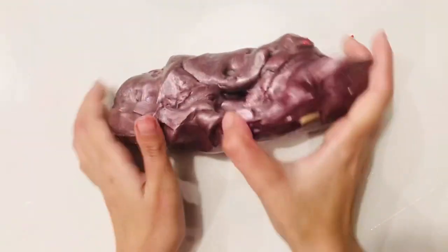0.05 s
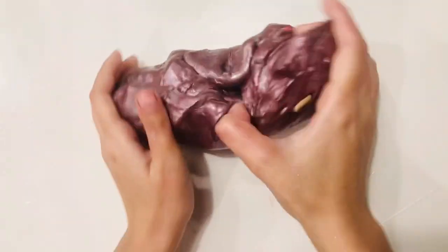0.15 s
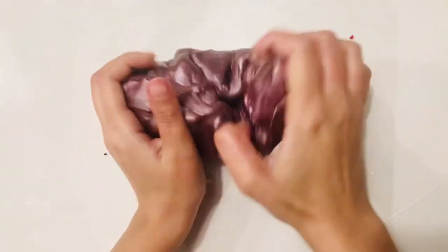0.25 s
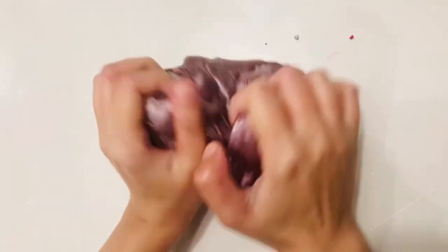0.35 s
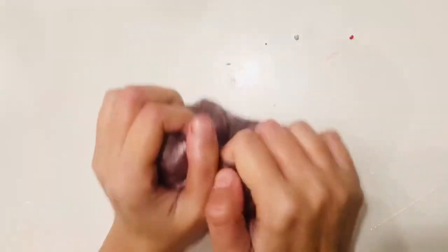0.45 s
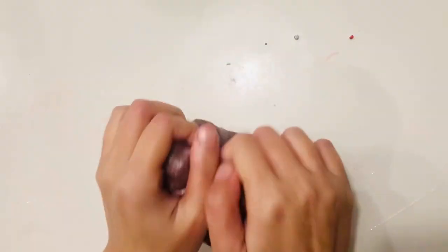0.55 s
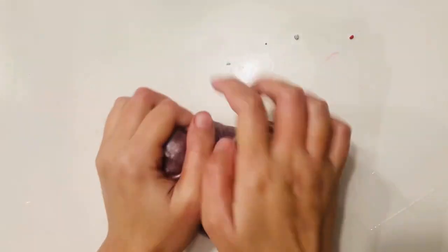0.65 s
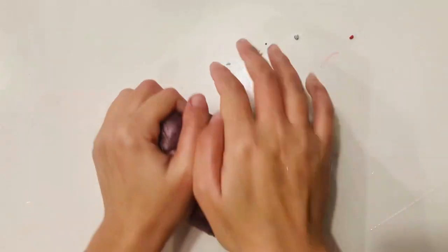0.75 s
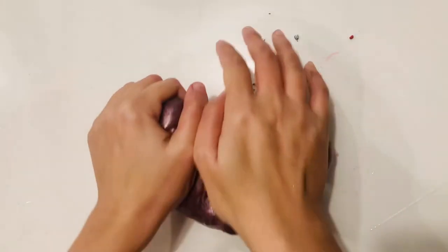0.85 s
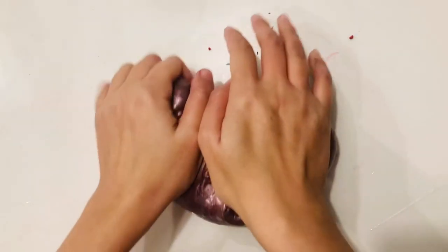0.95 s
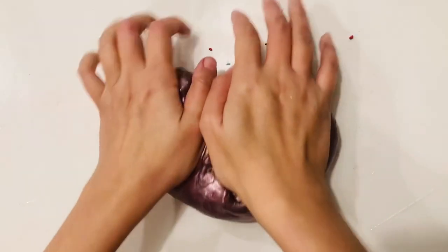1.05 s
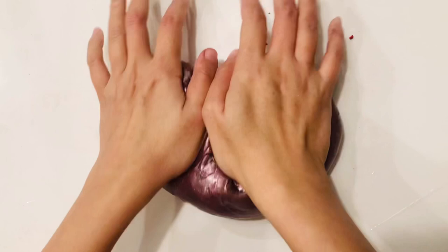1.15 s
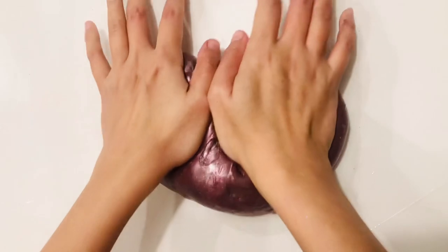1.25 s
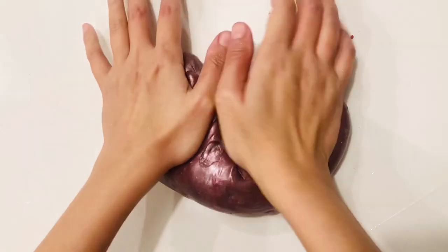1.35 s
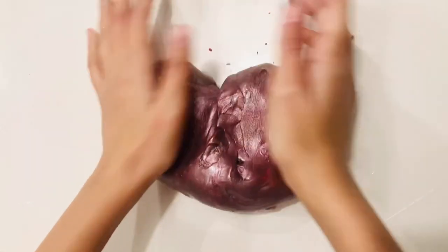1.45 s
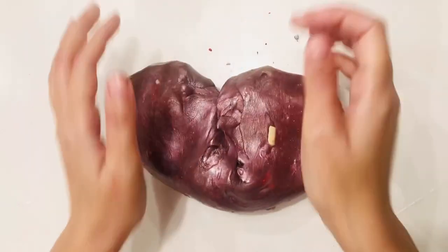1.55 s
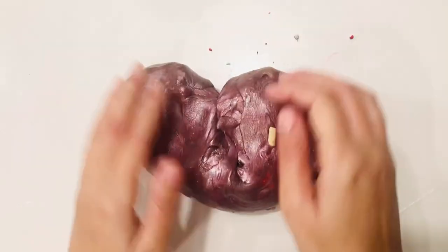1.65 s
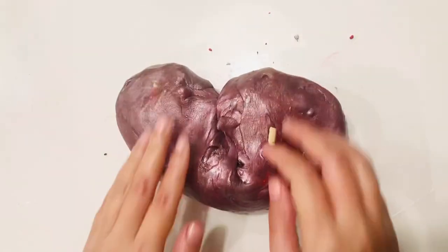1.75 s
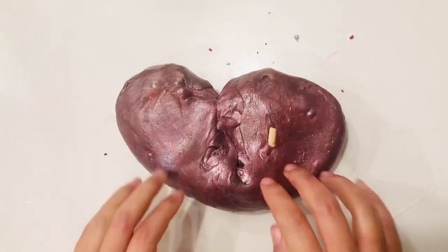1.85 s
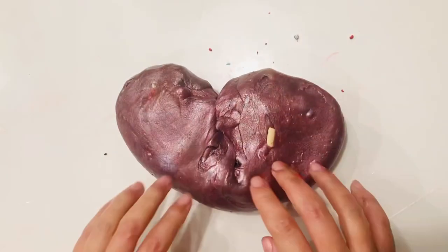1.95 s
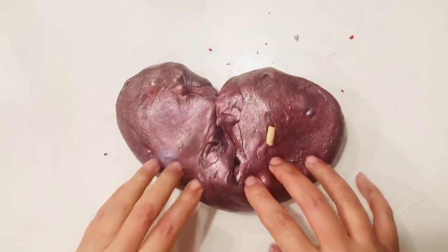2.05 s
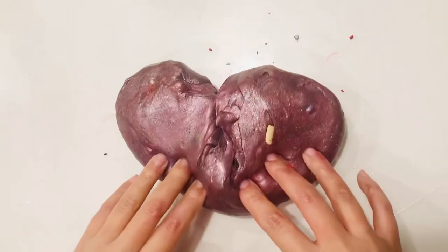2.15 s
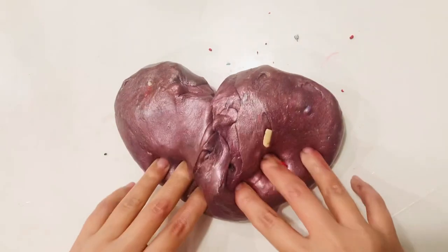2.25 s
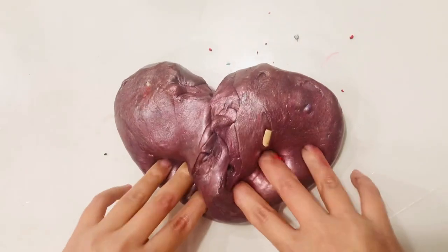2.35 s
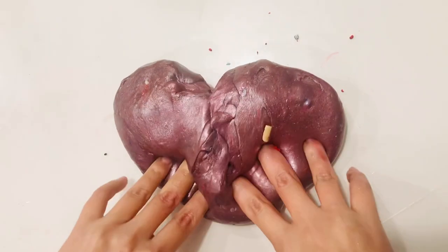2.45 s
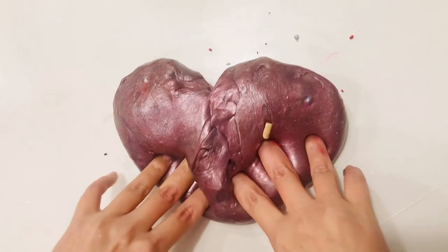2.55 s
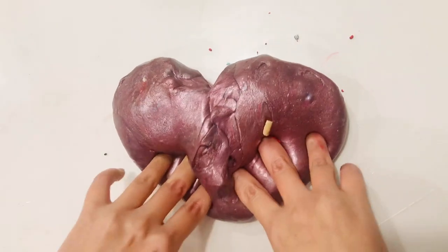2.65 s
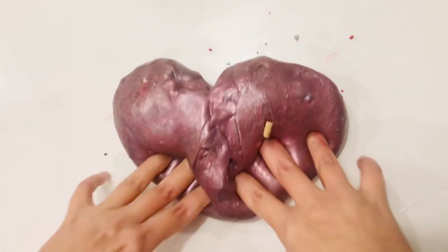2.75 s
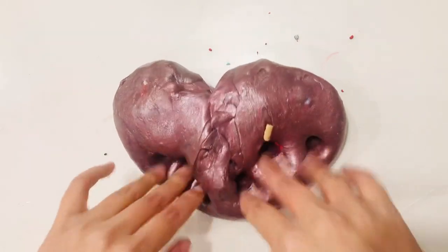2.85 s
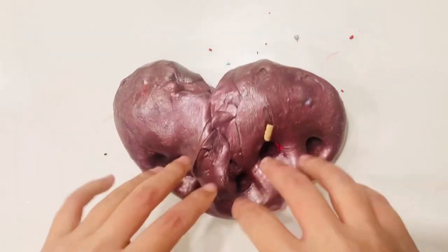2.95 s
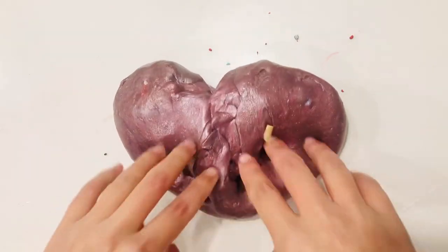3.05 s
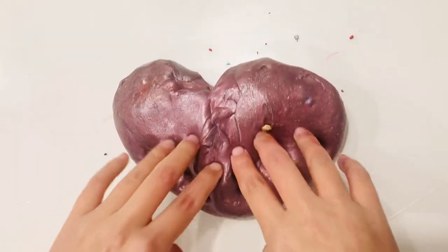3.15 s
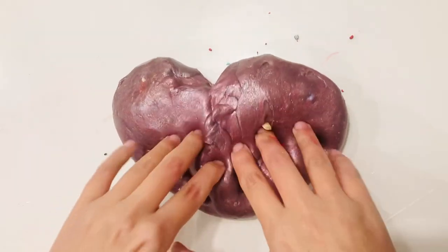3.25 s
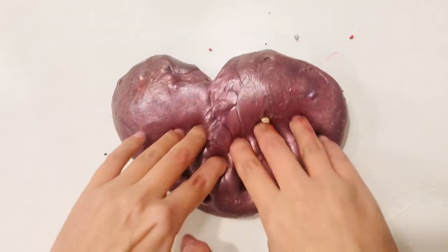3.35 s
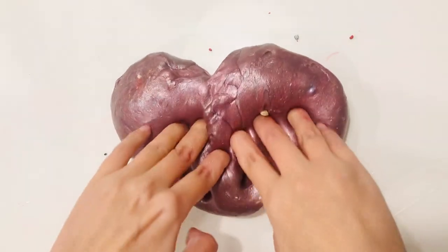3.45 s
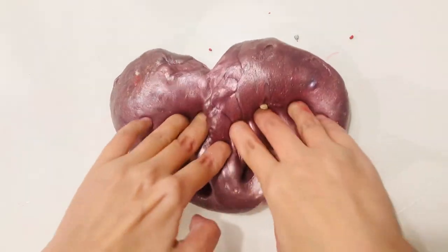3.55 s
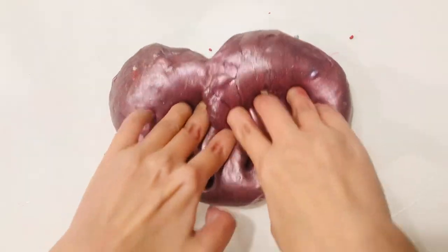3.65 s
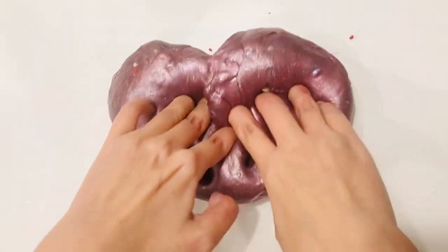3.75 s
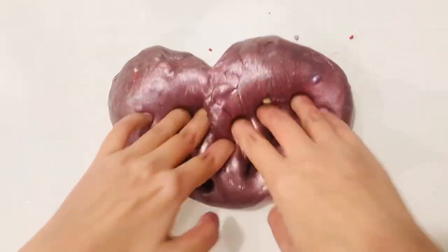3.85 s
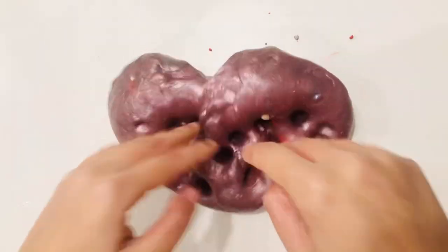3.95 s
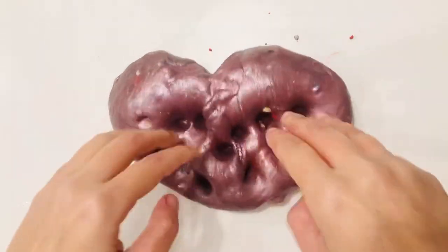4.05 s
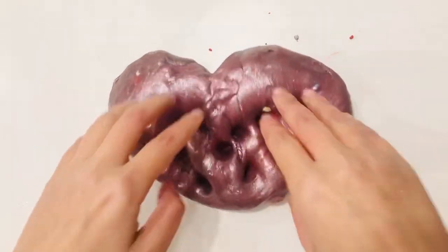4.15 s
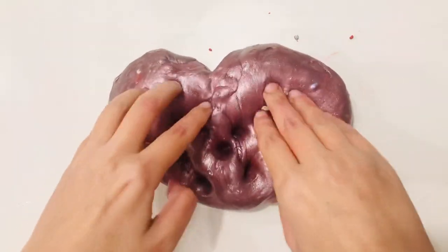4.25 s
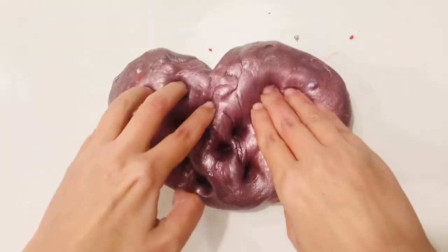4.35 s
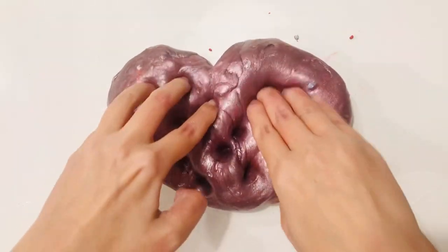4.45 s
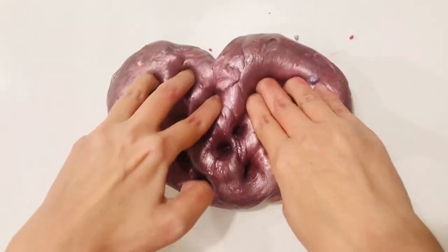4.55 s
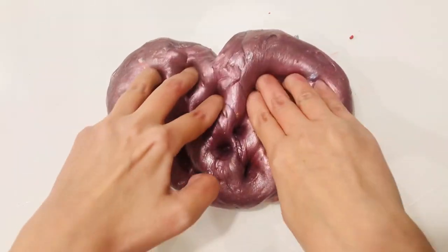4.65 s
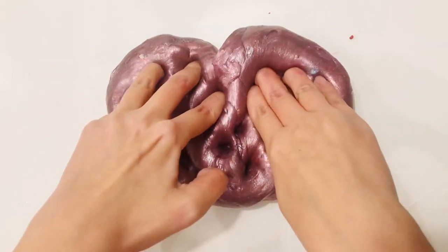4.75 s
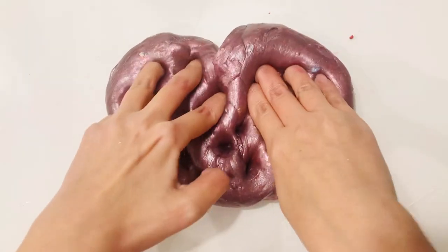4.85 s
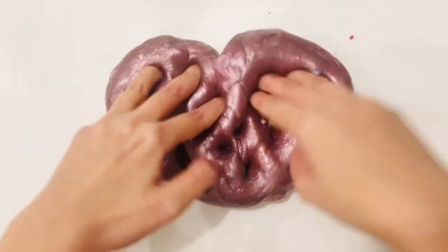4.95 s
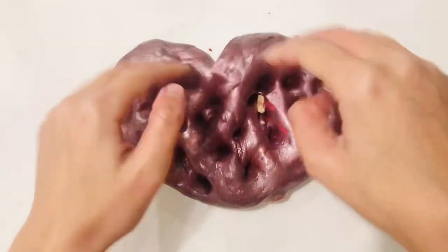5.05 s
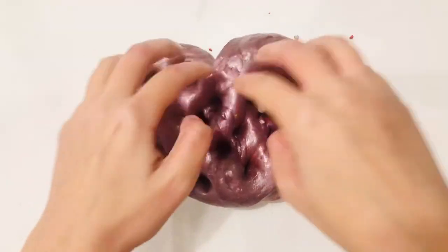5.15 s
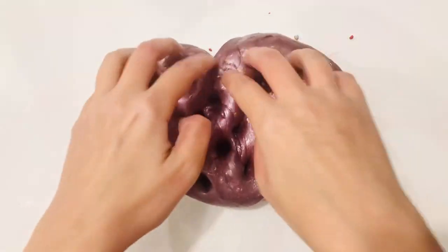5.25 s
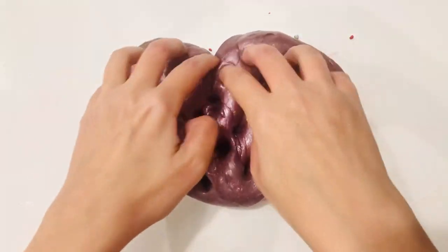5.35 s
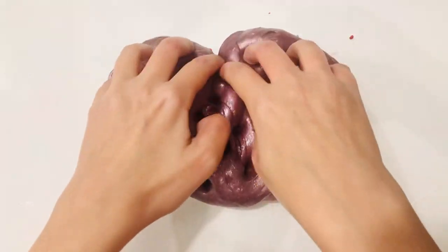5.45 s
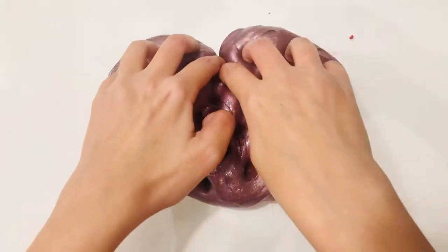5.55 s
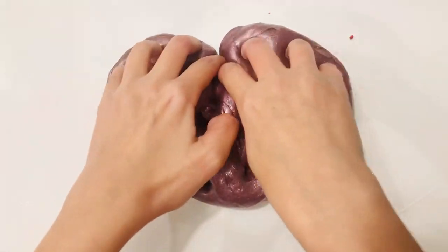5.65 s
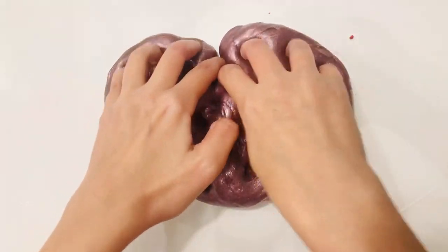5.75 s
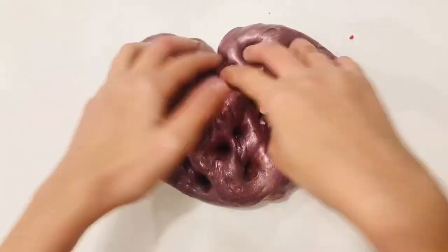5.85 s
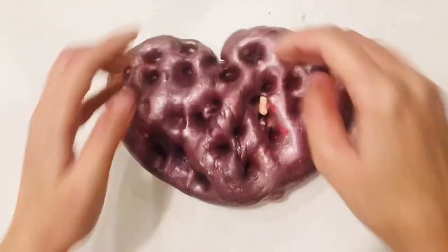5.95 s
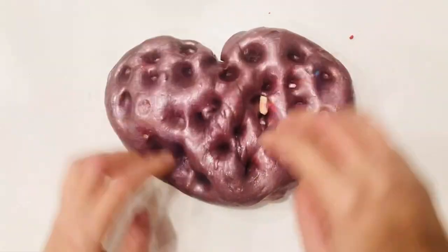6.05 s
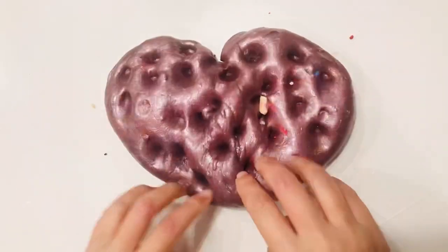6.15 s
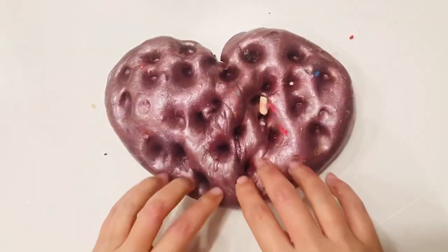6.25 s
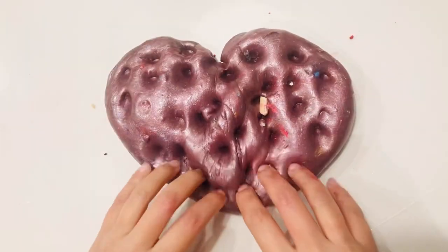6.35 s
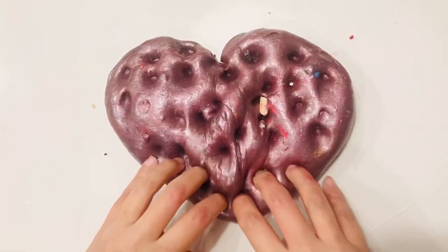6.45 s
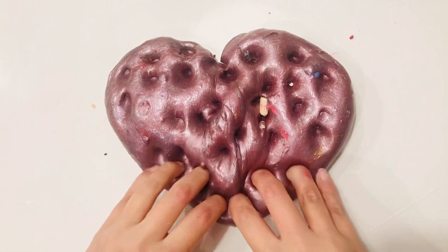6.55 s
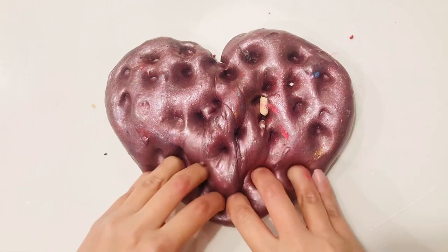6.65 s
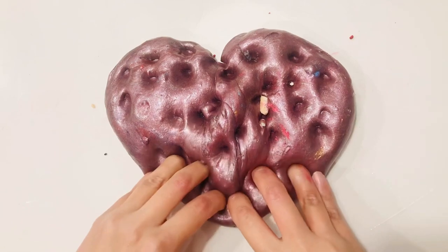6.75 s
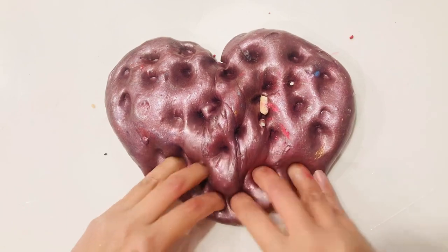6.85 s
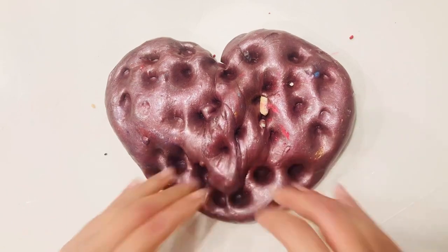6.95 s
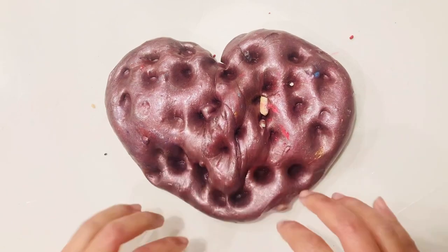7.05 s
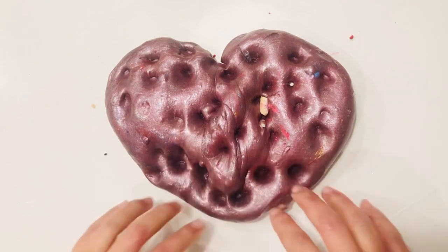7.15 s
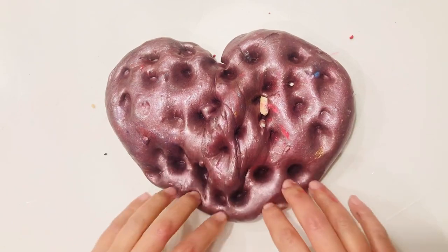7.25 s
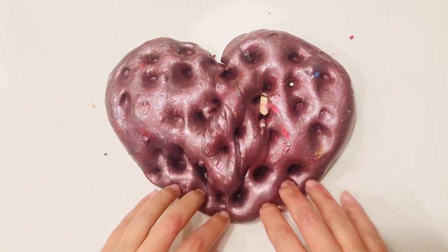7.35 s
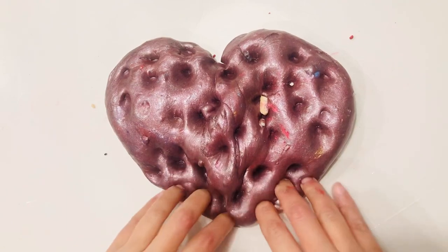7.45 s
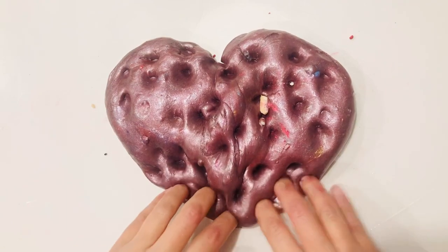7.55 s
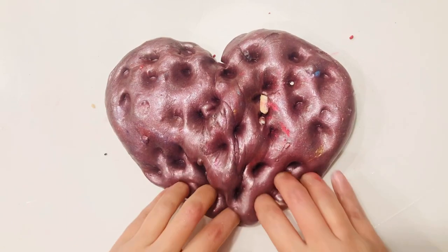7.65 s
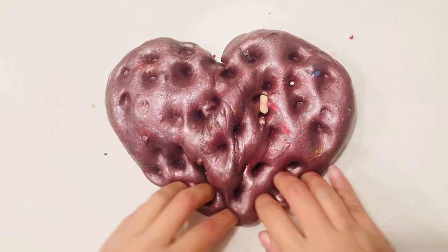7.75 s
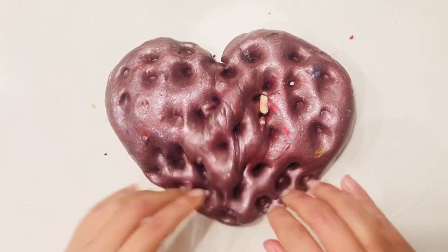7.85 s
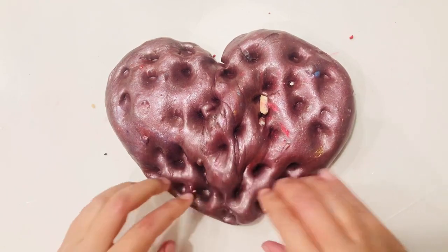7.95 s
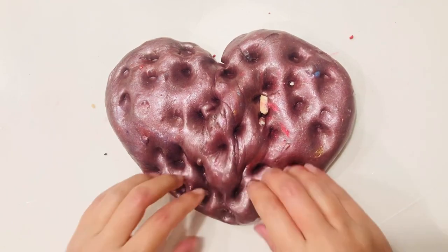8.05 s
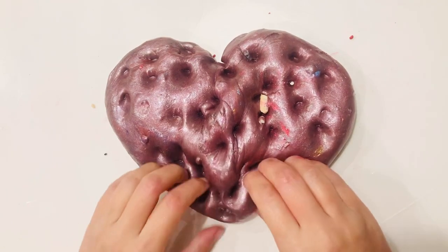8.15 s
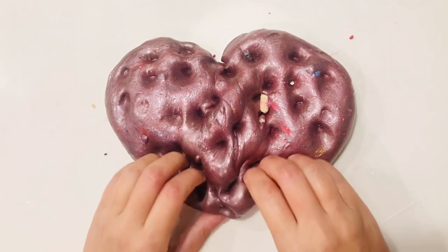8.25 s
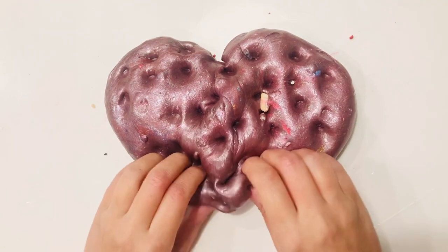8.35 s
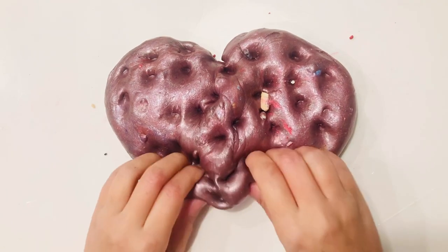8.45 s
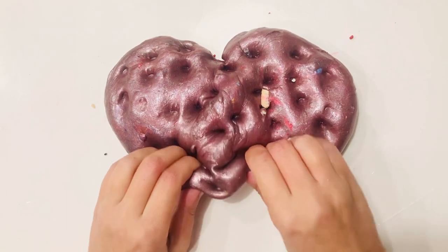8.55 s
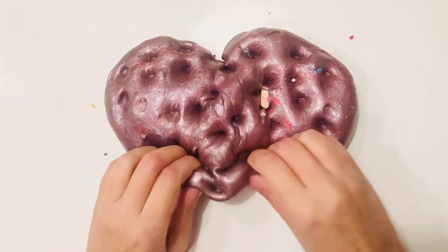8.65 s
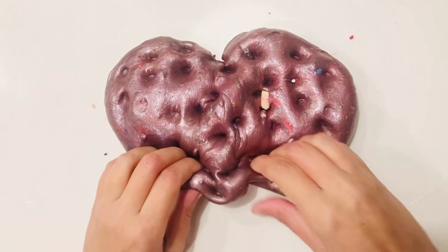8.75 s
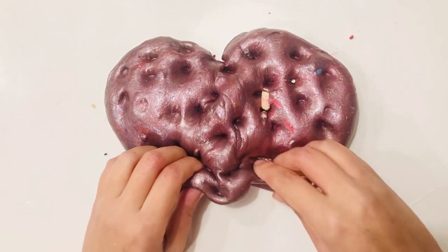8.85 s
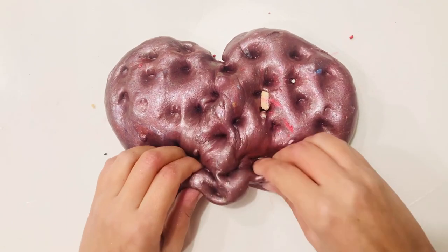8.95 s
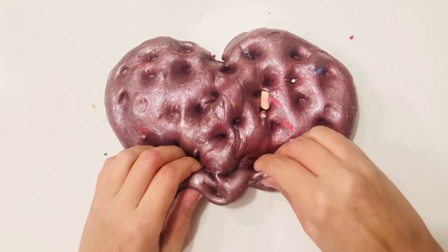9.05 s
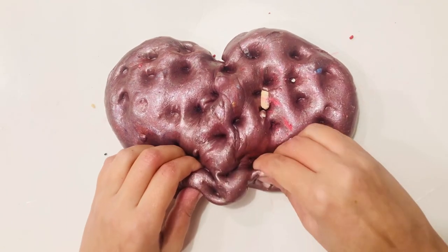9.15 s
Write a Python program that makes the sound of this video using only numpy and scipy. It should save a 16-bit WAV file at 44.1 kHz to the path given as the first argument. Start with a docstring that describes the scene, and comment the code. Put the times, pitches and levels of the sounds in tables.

```python
"""Air pockets burst in a lump of thick slime that two hands fold, press and poke on a table in a small quiet room.
Bursts layer partial sounds: a crack, as a short noise burst, and a ring, as a brief sine falling in pitch.
Air squeezed through folds squelches, and soft wet rustles swell: both are swarms of tiny resonant grains.
Bright ticks are very short rings with noise. Diffuse reflections follow, over steady air and an appliance's far-off hum."""
import sys
import numpy as np
from scipy import signal
from scipy.fft import rfft, irfft
from scipy.io import wavfile
from scipy.ndimage import uniform_filter1d

SR = 44100
rng = np.random.default_rng(int(sys.argv[2]) if len(sys.argv) > 2 else 0)


def unload_wav(signal):
    """Save mono or channel-first audio to the path in sys.argv[1] as 16-bit WAV at rate SR, clipped to [-1, 1]."""
    wavfile.write(
        sys.argv[1],
        SR,
        np.round(np.clip(np.atleast_2d(signal).T, -1, 1) * 32767).astype(np.int16),
    )


N = 406161

# Partial sounds of bursts, each row a ring and a crack; big bursts layer several:
# (time [s], relative ring level [dB], pitch [Hz], ring decay [cycles], relative crack level [dB])
BURST_PARTIALS = [(0.203, -46.5, 2900, 1.9, -43.5), (0.3149, -36.5, 860, 0.59, -56),
                  (0.3131, -11.5, 6130, 1.14, -15.5), (.525, -49.5, 380, 0.87, -45),
                  (.6027, -51.5, 670, 1.2, -45.5), (.8558, -26, 1150, 1.16, -11),
                  (.8563, -15, 4570, 1.1, -5.5), (1.1215, -28, 736, 0.74, -25),
                  (1.3091, -19.5, 4830, 1.65, -24), (1.3088, -33, 1980, 1.9, -40),
                  (1.3084, -28.5, 1140, 0.42, -15.5), (2.3429, -35, 1510, 1.23, -31.5),
                  (2.3428, -33, 570, 0.91, -31.5), (2.704, -36.5, 587, 1.43, -28),
                  (2.718, -34.5, 340, 1.4, -30), (3.501, -41, 570, 1.02, -26.5),
                  (3.733, -48, 475, 2.1, -59), (3.7565, -29.5, 1840, 4.1, -28),
                  (3.762, -37.5, 620, 1.4, -45), (3.873, -43, 580, 1.64, -44.5),
                  (4.414, -52.5, 485, 1.36, -42.5), (4.562, -46.5, 1320, 1.1, -50.5),
                  (4.5826, -44.5, 1310, 0.8, -46), (4.8412, -25.5, 2000, 1.47, -24),
                  (4.841, -26.5, 966, 1.6, -38), (4.8785, -31.5, 1100, 1.05, -30),
                  (4.9678, -44, 412, 1.1, -37), (5.222, -56, 1180, 1.5, -57),
                  (5.3425, -29, 1420, 0.75, -18.5), (5.7, -28, 3840, 3.6, -19),
                  (5.7039, -44.5, 370, 1.14, -36), (5.7242, -30, 1220, 0.82, -29),
                  (5.771, -31.5, 1390, 0.95, -47.5), (5.8208, -39, 1070, 1.2, -45),
                  (5.833, -42, 2140, 1.44, -50), (5.8454, -35.5, 980, 1.24, -33),
                  (6.126, -55.5, 1640, 1.9, -54.5), (6.4416, -42, 1290, 0.9, -41),
                  (6.7734, -26, 490, 0.77, -28), (6.7864, -27, 650, 0.56, -26), (7.6358, -32, 1440, 1, -26),
                  (7.746, -38, 1040, 0.92, -38.5), (7.766, -41.5, 2830, 1.6, -48),
                  (7.9759, -30.5, 5250, 3.9, -21.5), (7.977, -51, 823, .7, -35), (8.081, -54, 1403, 3, -48),
                  (8.364, -44.5, 970, 0.91, -39)]
# Air forced through folds: (start [s], end [s], relative level [dB], tilt [dB/octave])
FOLD_SQUELCHES = [(2.676, 2.712, -44.5, 1), (2.698, 2.707, -34.5, 0.3), (3.741, 3.825, -44.5, 0),
                  (4.83, 4.846, -35.5, 1.3), (4.844, 4.923, -46.5, 0.1), (5.718, 5.81, -49.5, 0.5),
                  (5.818, 5.869, -56, -1), (6.768, 6.797, -43, 0), (7.66, 7.723, -46, 1.1),
                  (7.737, 7.785, -57, -3.3)]
# Soft wet rustles, and brief swells of hiss that lead into some bursts: # (start [s], end [s], relative level
# [dB], tilt [dB/octave])
WET_RUSTLES = [(.008, 0.148, -61.5, 0.5), (0.159, 0.294, -56, -0.5), (0.432, 0.561, -57, 1.3),
               (0.796, 0.923, -55.5, 0), (1.23, 1.397, -54, 1.5), (2.117, 2.25, -84.5, 8.5),
               (2.608, 2.706, -65, 4.5), (3.355, 3.595, -62.5, 1.3), (3.7, 3.741, -61.5, -1),
               (3.826, 3.99, -62, 0.4), (4.398, 4.447, -68, -2), (4.603, 4.672, -66.5, -1),
               (4.776, 4.85, -68, 4.2), (6.268, 6.35, -71, 3.7), (6.743, 6.79, -53, -1),
               (7.967, 7.976, -60, -3), (8.162, 8.233, -69.5, -0.5), (8.353, 8.418, -63.5, 0.5),
               (8.535, 8.632, -62, 2), (8.682, 8.868, -78, 4.2)]
# Colour of the squelch and rustle grains before the tilt: (frequency [Hz], relative level [dB])
GRAIN_SPECTRUM = [(350, 1), (630, -9.5), (1300, -2.5), (2500, -2.5), (5000, 1), (11000, -1), (14500, -6)]
# Bright ticks, some alone, some the sharp treble edge of a burst: (time [s], relative level [dB], pitch [Hz])
BRIGHT_TICKS = [(0.0768, -45, 5500), (.151, -39, 11000), (.252, -38, 4000), (0.2701, -36, 3600),
                (.551, -44, 2830), (.771, -48.5, 3260), (.846, -24, 3780), (1.1215, -32.5, 11700),
                (1.2873, -27.5, 4180), (2.1515, -33, 9450), (2.21, -37.5, 11100), (2.2481, -34, 12500),
                (2.312, -40.5, 9900), (2.33, -45, 4500), (2.3423, -26, 8900), (2.428, -37.5, 7000),
                (2.6573, -28, 9100), (2.6817, -20, 6800), (2.691, -26, 7000), (2.703, -23, 7700),
                (3.322, -41.5, 8500), (3.4446, -31, 6930), (3.5007, -29.5, 5060), (3.5399, -36.5, 4400),
                (3.7296, -28.5, 9060), (3.8717, -32, 3000), (4.186, -47.5, 3770), (4.257, -49.5, 7020),
                (4.4571, -37.5, 7000), (4.519, -36.5, 10660), (4.65, -27, 7560), (4.8313, -22, 11000),
                (4.8344, -14.5, 6700), (4.8679, -25, 9000), (5.3416, -16, 10260), (5.346, -22.5, 7630),
                (5.506, -40, 8130), (5.518, -36.5, 6070), (5.7234, -16.5, 6300), (6.343, -40, 10050),
                (6.4399, -39, 9460), (6.484, -38, 12060), (6.526, -43.5, 9000), (6.772, -15, 5830),
                (6.785, -15.5, 8200), (7.1132, -48.5, 4200), (7.242, -51, 2500), (7.491, -45.5, 4500),
                (7.636, -29, 11000), (8.0731, -31, 13200), (8.3574, -41, 2990), (8.396, -37, 3400),
                (8.5821, -31, 7000), (8.844, -47, 4600), (9.0356, -37.5, 7400)]
# Spectrum of the room's reflections: (frequency [Hz], relative level [dB])
REFLECTION_SPECTRUM = [(150, -2), (400, -2.5), (1000, -0.5), (2200, -3.5), (4500, -1.5), (7000, -4.5),
                       (10000, -5.5), (16000, -13)]
# Time for the reflections to decay by 60 dB: (frequency [Hz], decay time [s])
REVERBERATION_TIME = [(150, 0.41), (1000, 0.6), (4000, 0.47), (8000, 0.41), (16000, 0.78)]
# Spectral density of the background air: (frequency [Hz], relative level [dB per Hz])
AIR_SPECTRUM = [(15, -63), (25, -37), (48, -2), (175, -4.5), (200, -6.5), (263, -3.5), (384, -12.5),
                (695, -17), (988, -23), (1260, -22.5), (2690, -31.5), (3080, -29), (4030, -31.5),
                (11000, -33), (16000, -41)]
# Appliance hum: (frequency [Hz], half the width of each resonance [Hz], relative level [dB])
HUM_LINES = [(61.7, 4.1, -72), (86.6, 7, -67.5), (113.3, 9.8, -65.5), (145.3, 5, -72.5),
             (180.4, 4.2, -70.5), (262.5, 22, -73), (336.8, 18, -75.5)]

# The shorter a ring in cycles, the further it sinks in pitch:
# pitch-fall exponent for a one-cycle ring, and its power of the cycles
PITCH_FALL, FALL_LAW = 0.82, -1.1
# Higher rings have brighter cracks: crack pitch [Hz] for a ring at RING_HZ, and its power of the ring's pitch
RING_HZ, CRACK_HZ, CRACK_LAW = 1000, 3300, 0.22
TILT_PIVOT_HZ = 2500  # the tilts leave this frequency unchanged
# A random crackle thickens during each rustle and a little around it
RUSTLING_TICKS_PER_S, RESTING_TICKS_PER_S, CRACKLE_MARGIN_S = 41, 6, .07
AIR_DB = -60.5  # rms before the offset given to background()
PEAK_LIMIT = 0.59  # full scale is 1
CUTOFF_HZ = 15800


def pops(ring_db, crack_db):
    """Cavity resonance and rupture: bursts are layered from rings and cracks, short rings sinking furthest."""
    out = np.zeros(N)
    t = np.arange(SR // 25) / SR
    for s, level_db, hz, cycles, tear_db in BURST_PARTIALS:
        fall = PITCH_FALL * cycles ** FALL_LAW
        decay = cycles / hz
        start_hz = hz * 2 ** fall  # the pitch passes hz one decay time after the onset
        ring = from_db(level_db + ring_db) * cavity(t, start_hz, fall, decay)
        crack_hz = CRACK_HZ * (hz / RING_HZ) ** CRACK_LAW
        tear = from_db(tear_db + crack_db) * crack(t, crack_hz, decay=0.0017, width=0.92)
        add(out, s, ring + tear)
    return out


def cavity(t, hz, fall, decay):
    """Damped oscillation of an opening cavity: it swells, decays and sinks in pitch; envelope peak 1."""
    age = t / max(decay, 1 / SR)
    pitch = np.minimum(hz / (1 + age) ** fall, SR / 2)
    envelope = np.sqrt(2 * age) * np.exp(.5 - age)
    phase = 2 * np.pi * np.cumsum(pitch) / SR
    return envelope * np.sin(phase)


def crack(t, hz, decay, width):
    """Impulsive rupture radiates a smooth broad band; its energy is that of one millisecond at rms 1."""
    fade = np.exp(-t / decay)
    spectrum = rfft(rng.standard_normal(len(t)) * fade)
    flat_spectrum = spectrum / (np.abs(spectrum) + 1e-12)  # a tear has no pitch of its own
    burst = irfft(flat_spectrum, len(t)) * np.sqrt(fade)
    burst = resonate(resonate(burst, hz, width * hz), hz, width * hz)
    return burst / np.sqrt(np.sum(burst ** 2) * 1000 / SR)


def grain_swarm(strokes, level_db, grains_per_s, spread_db, width, edge_s, swell_db, sag_db):
    """Superposed random impulses excite brief resonances at many pitches, heard as wet squelch or rustle."""
    out = np.zeros(N)
    pitches = np.geomspace(350, 14500, num=20)
    for hz in pitches:
        flow = np.zeros(N)
        for start, end, stroke_db, tilt_db in strokes:
            phase = np.linspace(-1, 1, max(int((end - start) * SR), 2))
            db = stroke_db + at_hz(GRAIN_SPECTRUM, hz) + tilt_db * np.log2(hz / TILT_PIVOT_HZ)
            # the level swells and ebbs; a positive sag weakens its end, a negative one its start
            add(flow, start, from_db(db - swell_db * phase ** 2 - sag_db * phase))
        flow = uniform_filter1d(flow, max(int(edge_s * SR), 1))  # soft edges
        born = np.flatnonzero(rng.random(N) < grains_per_s / SR)  # rate for each pitch
        sizes = np.minimum(rng.exponential(1, len(born)), 4)
        sizes = sizes * (hz / pitches[-1]) ** .2  # high grains are more uneven
        grains = np.zeros(N)
        grains[born] = rng.choice([-1, 1], len(born)) * from_db(spread_db * sizes)
        driven = rms_one(grains) * flow
        ring = resonate(resonate(driven, hz, width * hz), hz, width * hz)
        out += ring / np.sqrt(np.pi * width * hz / SR)  # compensates for bandwidth
    return from_db(level_db) * out


def ticks(level_db, spread_db, low_hz, high_hz, snap_cycles, crackle_cycles):
    """Strongly damped oscillation: bright ticks, over a random crackle that is denser around rustles."""
    out = np.zeros(N)
    t = np.arange(SR // 70) / SR
    for s, db, hz in BRIGHT_TICKS:
        snap = from_db(2.5) * cavity(t, hz, fall=0.091, decay=snap_cycles / hz)
        # a noisy tail outlasts the snap
        fray = from_db(-14) * crack(t, .8 * hz, decay=0.0038, width=3.2)
        add(out, s, from_db(db) * (snap + fray))

    clock = np.arange(N) / SR
    rate = np.full(N, float(RESTING_TICKS_PER_S))
    for start, end, *_ in WET_RUSTLES:
        near_rustle = (clock > start - CRACKLE_MARGIN_S) & (clock < end + CRACKLE_MARGIN_S)
        rate[near_rustle] = RUSTLING_TICKS_PER_S
    times = clock[rng.random(N) < rate / SR]
    for s, (size, height, fall) in zip(times, rng.random((len(times), 3))):
        hz = low_hz * (high_hz / low_hz) ** height
        gain = from_db(level_db + spread_db * size ** 3)  # strong ticks are rare
        add(out, s, gain * cavity(t, hz, fall / 2, crackle_cycles / hz))
    return out


def slime_colour(x, hz, width_hz, boost):
    """A parallel resonance gives everything the slime does a mild peak in the upper middle."""
    return x + boost * resonate(x, hz, width_hz)


def room(x, wet_db, first_s, build_s):
    """Diffuse reverberation: noise-like reflections build up after a short gap and decay band by band."""
    t = np.arange(SR * 3 // 4) / SR
    edges = np.geomspace(120, 17000, num=13)
    response = 0
    for low, high in zip(edges, edges[1:]):
        hz = np.sqrt(low * high)
        band_filter = signal.butter(2, [low, high], "band", fs=SR, output="sos")
        band = signal.sosfilt(band_filter, rng.standard_normal(len(t)))
        decay_db = at_hz(REFLECTION_SPECTRUM, hz) - 60 * t / at_hz(REVERBERATION_TIME, hz)
        response = response + band * from_db(decay_db)
    response = response * (1 - np.exp(-np.maximum(t - first_s, 0) / build_s))
    response = response / np.linalg.norm(response)
    return from_db(wet_db) * signal.fftconvolve(x, response)[:N]


def background(air_db, hum_db):
    """Filtered noise: steady room air, and narrow resonances that waver as an appliance's low hum."""
    hz = np.fft.rfftfreq(N, 1 / SR)
    air_spectrum = rfft(rng.standard_normal(N)) * from_db(at_hz(AIR_SPECTRUM, hz))
    air = rms_one(irfft(air_spectrum, N))
    hum = np.zeros(N)
    for line_hz, half_width, db in HUM_LINES:
        line = resonate(rng.standard_normal(N), line_hz, 2 * half_width)
        line = resonate(line, line_hz, 2 * half_width)
        hum += from_db(db) * rms_one(line)
    return from_db(AIR_DB + air_db) * air + from_db(hum_db) * hum


def resonate(x, hz, width_hz):
    """Two-pole resonance with unit gain at its peak; the pole radius sets the damping."""
    radius = np.exp(-np.pi * width_hz / SR)
    angle = 2 * np.pi * min(hz, SR / 2 - 1) / SR
    zeros = np.array([1, 0, -1]) * (1 - radius * radius) / 2
    poles = [1, -2 * radius * np.cos(angle), radius * radius]
    return signal.lfilter(zeros, poles, x + 1e-18)


def from_db(db):
    """Amplitude ratio from a level: 20 dB is a factor of ten."""
    return 10 ** (np.asarray(db) / 20)


def rms_one(x):
    """Normalisation by mean power to an rms of 1."""
    return x / np.sqrt(np.mean(x ** 2) + 1e-20)


def at_hz(points, hz):
    """Linear interpolation of a table on a log-frequency axis."""
    points = np.array(points)
    return np.interp(np.log(hz + 1e-9), np.log(points[:, 0]), points[:, 1])


def add(out, s, sound):
    """Linear superposition: mixes a sound in at its time in seconds."""
    at = int(np.clip(round(s * SR), 0, N - 1))
    out[at:at + len(sound)] += sound[:N - at]


def scene():
    """Superposition of the slime's direct sound, its reflections and the steady background."""
    slime = pops(ring_db=2.0, crack_db=-9.5)
    slime += grain_swarm(FOLD_SQUELCHES, level_db=-7.0, grains_per_s=260, spread_db=3.0, width=0.42,
                         edge_s=0.008, swell_db=0.5, sag_db=1.0)
    slime += grain_swarm(WET_RUSTLES, level_db=-6.0, grains_per_s=260, spread_db=4.0, width=0.29,
                         edge_s=0.0067, swell_db=13.5, sag_db=-1.0)
    slime += ticks(level_db=-59.5, spread_db=9, low_hz=3480, high_hz=13000,
                   snap_cycles=0.49, crackle_cycles=0.65)
    slime = slime_colour(slime, hz=2180, width_hz=540, boost=0.42)
    reflections = room(slime, wet_db=-13.5, first_s=0.00082, build_s=0.001)
    mix = slime + reflections + background(air_db=-2.5, hum_db=-0.5)
    return mix[None]  # one channel


def record(dry):
    """Saturation rounds the sharpest peaks, then a steep low-pass filter cuts the top."""
    rounded = PEAK_LIMIT * np.tanh(dry / PEAK_LIMIT)
    low_pass = signal.butter(28, CUTOFF_HZ, fs=SR, output="sos")
    return signal.sosfilt(low_pass, rounded)


dry = scene()
out = record(dry)
unload_wav(out)
```